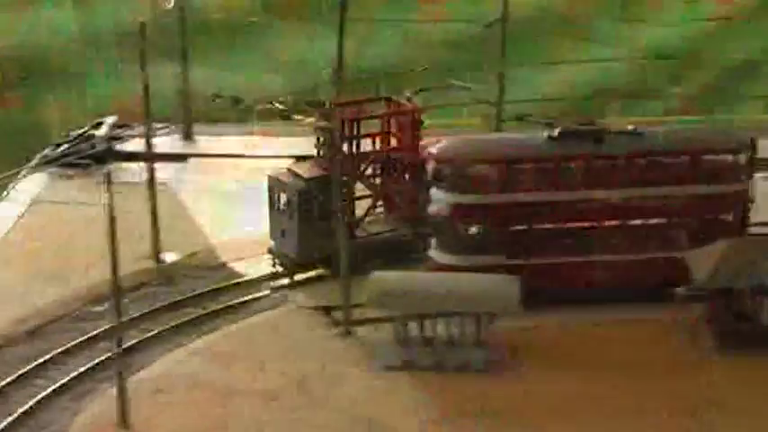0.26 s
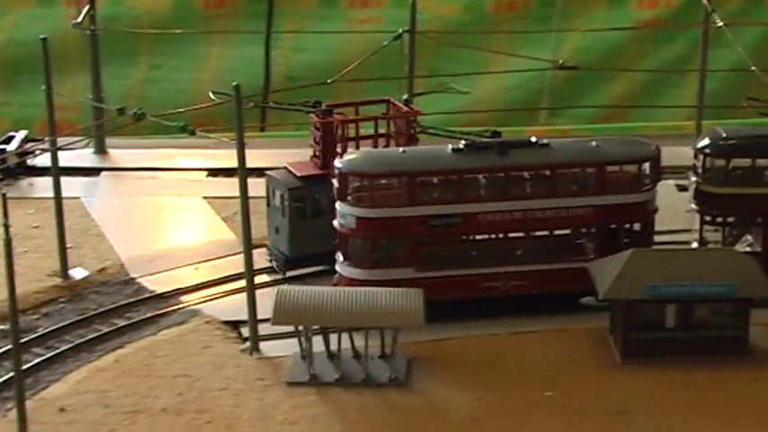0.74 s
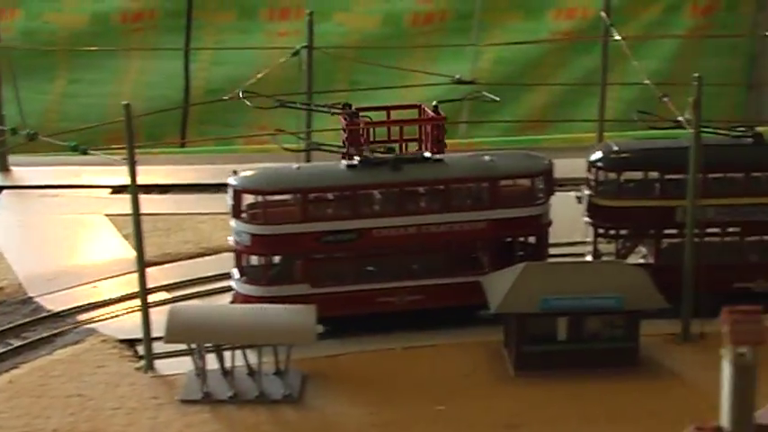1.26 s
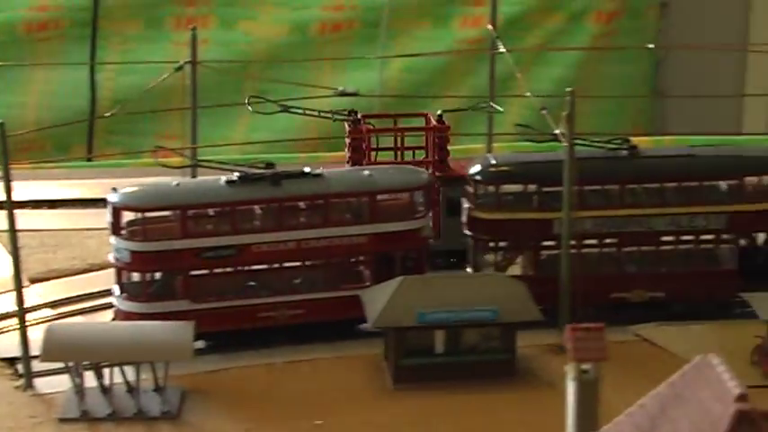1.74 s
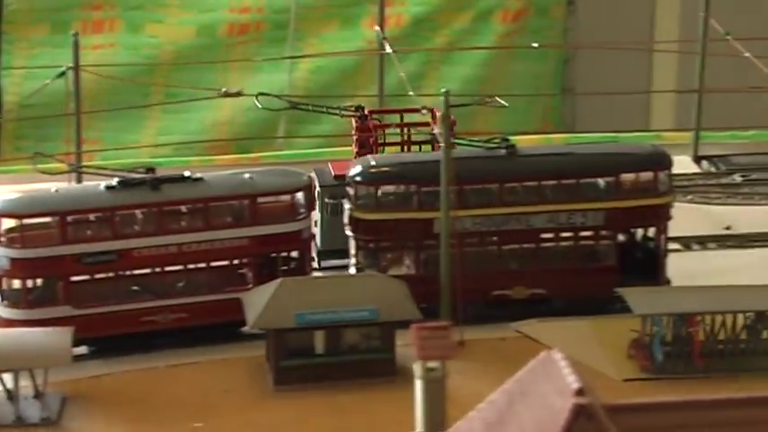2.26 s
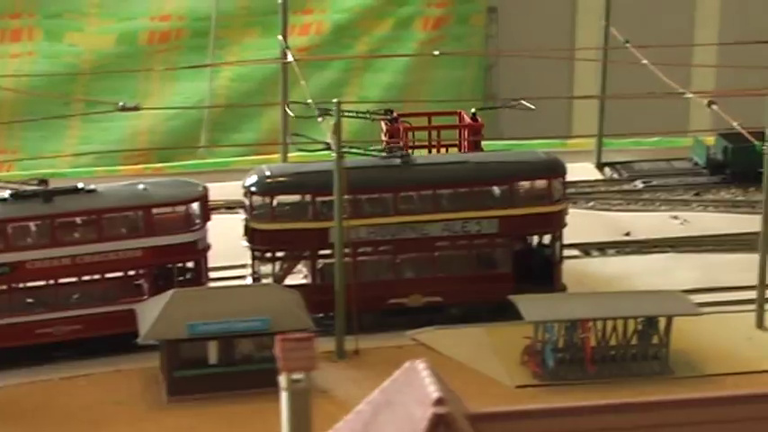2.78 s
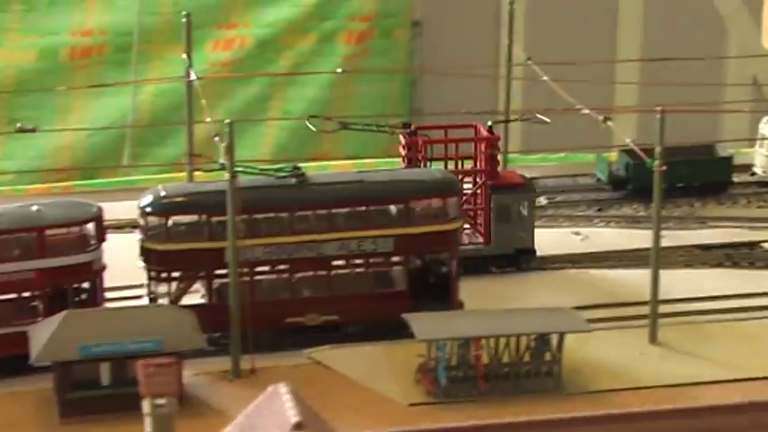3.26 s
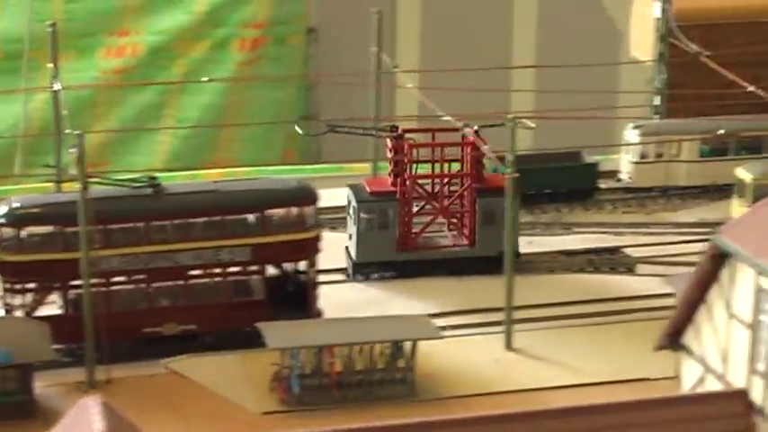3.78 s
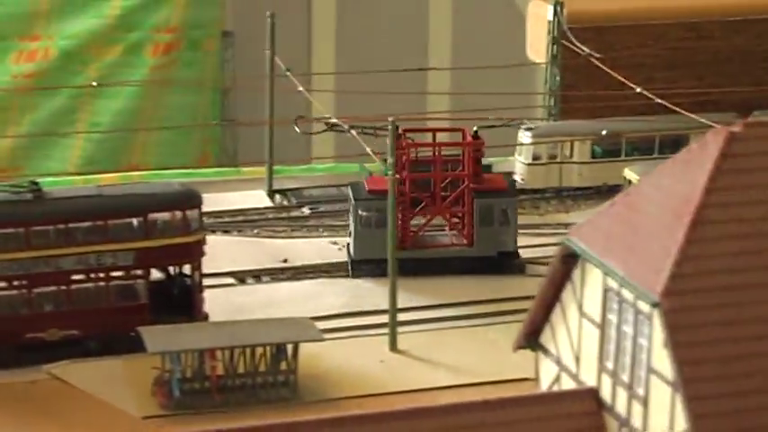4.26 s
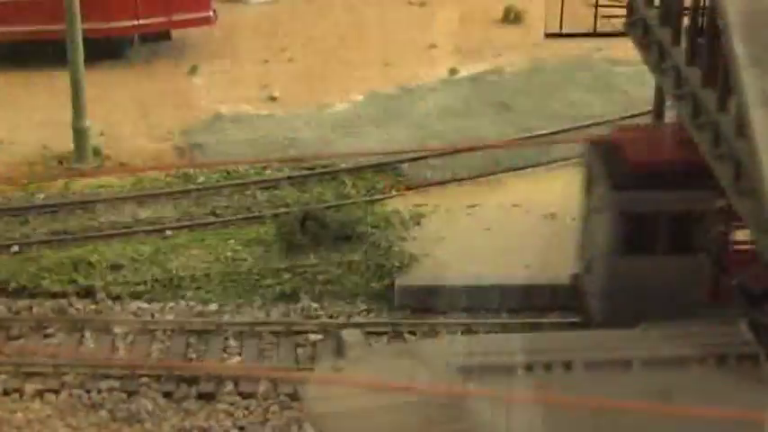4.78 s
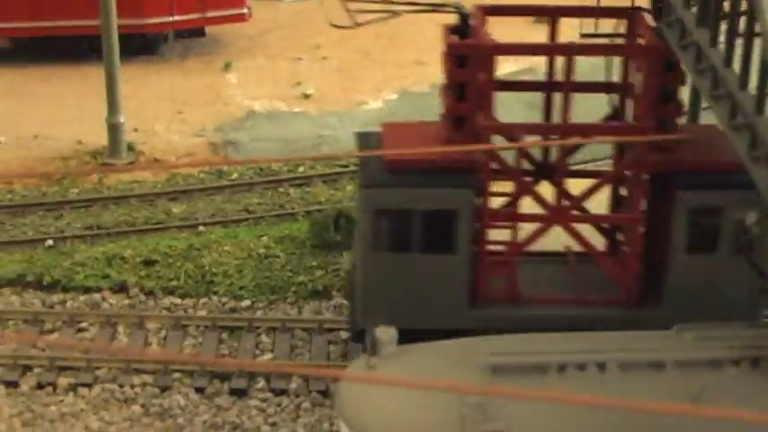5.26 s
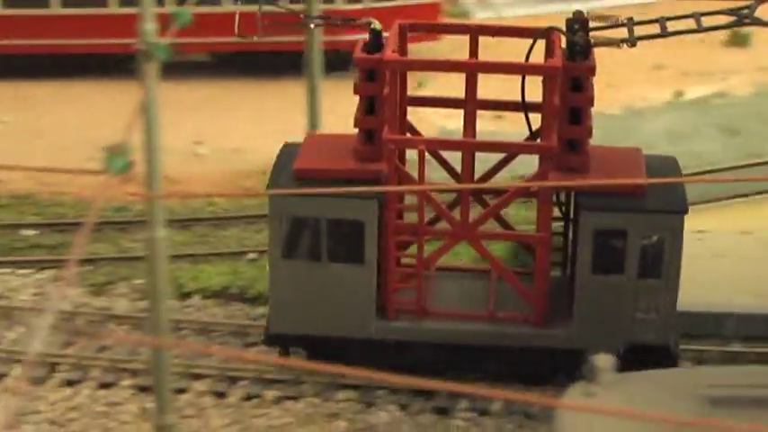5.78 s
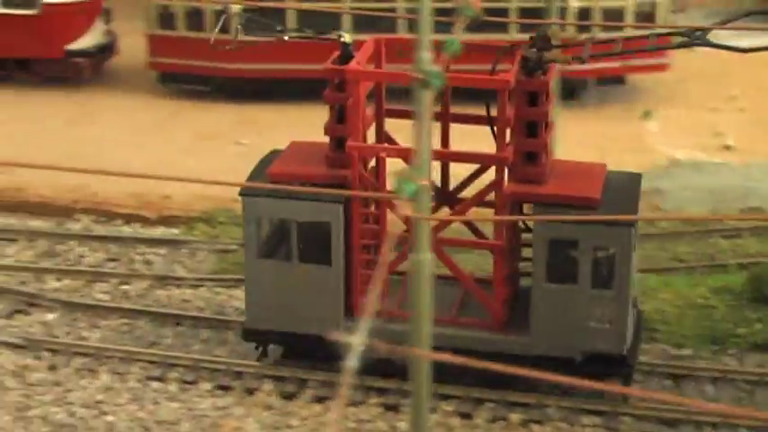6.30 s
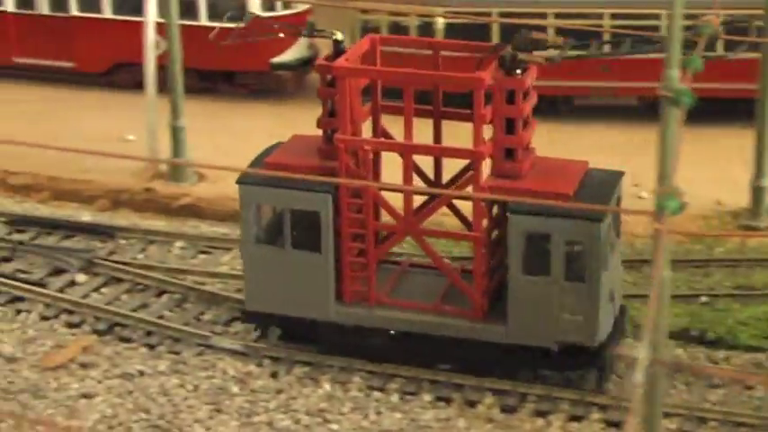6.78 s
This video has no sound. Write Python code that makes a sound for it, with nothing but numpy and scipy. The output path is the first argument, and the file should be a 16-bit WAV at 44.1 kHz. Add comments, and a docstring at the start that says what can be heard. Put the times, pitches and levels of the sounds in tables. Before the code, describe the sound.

A small electric model tram whirs along with a steady hiss and thin high whine, its wheels drumming hollowly and clicking on the track.

```python
"""Model tram on a layout

A model tram is heard fairly close, then farther off, then close again from about 4.8 s; near 0.5 s it dips
briefly. The motor is coloured noise that swings with the rotor, plus noise-fed ringing modes. Wheels drum on
the baseboard as shaped noise, grind as streams of tiny impacts and click over joints as short bursts and rings.
A small room adds a decaying noise tail; a stereo microphone pair hears it all.
"""
import sys
import numpy as np
from scipy import signal
from scipy.fft import rfft, irfft
from scipy.io import wavfile
from scipy.ndimage import uniform_filter1d

SR = 44100
rng = np.random.default_rng(int(sys.argv[2]) if len(sys.argv) > 2 else 0)


def generate_wav(signal):
    """Clip the signal to [-1, 1] and save it as 16-bit WAV at the path in sys.argv[1]."""
    frames = np.transpose(np.atleast_2d(signal))
    scaled = np.clip(frames, -1, 1) * 32767
    pcm = np.round(scaled).astype(np.int16)
    wavfile.write(sys.argv[1], SR, pcm)


N = 310464
TIME, FREQS = np.arange(N) / SR, np.fft.rfftfreq(N, 1 / SR)


def amp(db):
    """Decibels to gain."""
    return 10 ** (np.asarray(db) / 20)


def unit(x):
    """Scales to rms 1."""
    return x / np.sqrt(np.mean(x ** 2) + 1e-20)


def curve(rows, column=1):
    """One column of a table, interpolated over time."""
    table = np.transpose(rows)
    return np.interp(TIME, table[0], table[column])


def read(points, hz):
    """A spectrum table, interpolated on a log-frequency axis."""
    f, value = np.transpose(points)
    return np.interp(np.log(hz + 1), np.log(f + 1), value)


def colour(x, points):
    """Filters by a spectrum table, to rms 1."""
    gain = amp(read(points, FREQS))
    return unit(irfft(rfft(x) * gain, N))


def noise():
    """Two unrelated noises: sound from straight ahead and from the sides."""
    return rng.standard_normal((2, N))


def wander(rate_hz):
    """Slow random signal of rms 1, up to about this rate."""
    lowpass = np.exp(-(FREQS / rate_hz) ** 2)
    return unit(irfft(rfft(rng.standard_normal(N)) * lowpass, N))


def grains(per_s, spread_db, decay_s):
    """Tiny impacts at random times, of uneven size, each a short decaying burst of noise."""
    hits = rng.random(N) < per_s / SR
    sizes = amp(spread_db * np.minimum(rng.exponential(1, N), 4)) * hits
    power = signal.lfilter([1], [1, -np.exp(-2 / (decay_s * SR))], sizes ** 2)
    return unit(np.sqrt(power) * noise())


def resonance(x, hz, width_hz):
    """Rings a double-pole resonance of fixed or moving pitch, to rms 1."""
    turn = np.exp(2j * np.pi * np.cumsum(hz * np.ones(N)) / SR)
    r = np.exp(-np.pi * width_hz / SR)
    # shift the pitch to 0 Hz, low-pass, shift back
    return unit((turn * signal.lfilter([1], np.poly([r, r]), x / turn)).real)


def even(x, steadiness, size):
    """Evens out the strength over a moving window of size samples, to rms 1."""
    power = abs(uniform_filter1d(x[0] ** 2, size=size)) + 1e-9
    return unit(x / power ** steadiness)


def swell(middle_s, length_s):
    """A smooth rise and fall of height 1, down to e^-2 at length_s either side."""
    return np.exp(-2 * ((TIME - middle_s) / length_s) ** 2)


def add(mix, s, sound):
    """Mixes a sound in at a time."""
    part = mix[:, round(s * SR):][:, :sound.shape[-1]]
    part += sound[..., :part.shape[1]]


# how close the tram is heard: t/s, 0 far - 1 close
CLOSENESS = [(0, 0.55), (.4, 0), (4.55, 0.15), (4.95, 0.8), (7.04, 0.61)]


def by_distance(far, close):
    """Mixes the far and close values by how close the tram is heard."""
    closeness = np.clip(curve(CLOSENESS), 0, 1)
    return (1 - closeness) * far + closeness * close


def colour_by_distance(x, far, close):
    """Mixes the far and close colours by how close the tram is heard."""
    return by_distance(colour(x, far), colour(x, close))


FALTER_S, FADE_S, HOLD_S, RECOVER_S = 0.477, 0.029, 0.079, 0.1


def falter():
    """Depth of the brief level dip: 0 running - 1 deepest."""
    corners_s = [-FADE_S, 0, HOLD_S, HOLD_S + RECOVER_S]
    return np.interp(TIME - FALTER_S, corners_s, [0, 1, 1, 0])


# room air spectrum: f/Hz, relative density/dB
AIR_SPECTRUM = [(15, -32), (35, -32), (60, -4.5), (85, -2), (160, -4.5), (300, -6), (450, -9.5), (700, -9),
                (860, 1.5), (1100, -4.5), (1600, -12.5), (6000, -33)]


def room_air(level_db=-62):
    """The air of the room: steady coloured noise."""
    return amp(level_db) * colour(noise(), AIR_SPECTRUM)


# room decay: f/Hz, t60/s
ROOM_T60 = [(250, 0.42), (1000, 0.39), (3000, 0.16), (10000, 0.055)]


def room(x, wet_db=-6.5):
    """A short diffuse tail whose treble dies first."""
    hz, t, z = signal.stft(rng.standard_normal((2, SR // 2)), SR, nperseg=256)
    decay = np.exp(-np.log(1000) * t / read(ROOM_T60, hz)[:, None])
    tail = signal.istft(z * decay, SR, nperseg=256)[1]
    tail[:, :220] = 0  # 5 ms gap before the tail
    tail /= np.linalg.norm(tail[0])
    return x + amp(wet_db) * signal.fftconvolve(x[:1], tail, axes=1)[:, :N]


def reflections(x, strength=0.59, count=14):
    """Short echoes off track and model houses comb the sound, differently at each place on the way."""
    out, t = np.zeros((2, N)), np.arange(1500) / SR
    for place in range(count):
        sparse = rng.standard_normal(len(t)) * (rng.random(len(t)) < .05)
        taps = sparse * np.exp(-t / .018)
        taps *= strength / (np.linalg.norm(taps) + 1e-9)
        taps[0] = 1  # direct sound
        taps /= np.linalg.norm(taps)
        here = np.maximum(1 - abs(TIME / TIME[-1] * (count - 1) - place), 0)
        out += here * signal.oaconvolve(x, taps[None], axes=1)[:, :N]
    return out


# narrow board modes, far and close: f/Hz, width/Hz, boost/dB
MODES_FAR = [(244, 9.7, 9.5), (311, 110, 9), (317, 13, 5.5), (435.3, 14, 10.5), (531, 23, 18.5),
             (624, 4.2, 23.5), (680, 14, 13.5), (745, 8.9, 18.5), (980, 23, 25)]
MODES_CLOSE = [(216, 16, 6.5), (256, 9, 5.3), (291, 62, 7), (431, 12, 4.4), (480, 15, 13), (508, 5.8, 2.7),
               (571.5, 13, 16.6), (651, 2.6, 17.4), (716, 10, 5), (943, 21, 11)]


def board(x, modes, response):
    """The board's sound: a broad response with narrow modes standing out of it."""
    modes_db = sum(db / (1 + (2 * (FREQS - hz) / width) ** 2) for hz, width, db in modes)
    return colour(irfft(rfft(x) * amp(modes_db), N), response)


def second_mode(far_hz=612, close_hz=500, far_db=-21, close_db=-13,
                hollow_db=10, hollow_s=2.61, hollow_length_s=0.97):
    """The board's second mode, noise-fed, boosted on the hollow middle stretch."""
    ring = resonance(noise(), by_distance(far_hz, close_hz), width_hz=143)
    level_db = by_distance(far_db, close_db) + hollow_db * swell(hollow_s, hollow_length_s)
    return ring * amp(level_db)


# table boom: t/s, level/dB before boom_db
BOOM = [(.1, -52.5), (.35, -62.5), (2.3, -62.5), (2.95, -77), (3.4, -58), (5.0, -54.5), (7.04, -62)]
# table boom spectrum: f/Hz, relative density/dB
TABLE_SPECTRUM = [(30, -47), (80, -16.5), (120, -8.5), (155, -2), (205, -3), (260, -5), (500, -21)]


def table_boom(boom_db=-2):
    """The table booms: low coloured noise of changing level."""
    return colour(noise(), TABLE_SPECTRUM) * amp(curve(BOOM) + boom_db)


# rolling force on the board, greatest on the hollow middle stretch: t/s, relative level/dB
ROLLING = [(0, -54.5), (.55, -53.5), (.72, -52.5), (1.3, -58), (1.8, -48), (2.2, -45.5), (3.5, -48.5),
           (4.05, -54.5), (4.45, -51.5), (4.8, -52), (5.1, -50.5), (5.95, -52.5), (6.4, -49), (7.04, -48.5)]
# main board mode, shifting with the tram's place: t/s, f/Hz, level/dB before evening and rolling force
HUM = [(0, 293, -4.5), (1.7, 300, -11.5), (2.25, 317.6, -0.5), (2.6, 315, 1.5), (3.3, 331.6, -6),
       (4.05, 327.6, -1.5), (4.2, 327, 2), (4.45, 340, 1), (4.6, 344, 2), (4.8, 300, -7.5),
       (7.04, 311, -5.5)]
# broad board response, far and close: f/Hz, relative density/dB
BOARD_FAR = [(20, -75), (100, -44), (160, -29), (215, -11), (260, -1.5), (320, -4), (375, -10), (425, -7),
             (480, -54), (540, -16), (720, -16), (900, -39), (1400, -54), (3000, -73)]
BOARD_CLOSE = [(20, -60), (60, -26), (145, -16), (190, -3.5), (240, -5.5), (295, -6), (365, -4.5),
               (450, -1.5), (560, -12.5), (800, -4.5), (1200, -18.5), (1800, -10), (3500, -31)]


def baseboard(level_db=-2, lumps_db=1.0, steadiness=0.27, falter_db=-5):
    """Rough wheels drum on the hollow board under the track: noise through its modes."""
    wheels = noise()
    far, close = board(wheels, MODES_FAR, BOARD_FAR), board(wheels, MODES_CLOSE, BOARD_CLOSE)
    hum_hz = curve(HUM) + 3 * wander(12)
    hum = even(resonance(noise(), hum_hz, width_hz=31), .2, size=4000)
    drum = amp(level_db) * by_distance(far, close) + hum * amp(curve(HUM, column=2)) + second_mode()
    # partly evens out the drumming
    power = uniform_filter1d(drum[0] ** 2, size=4000) + 1e-9
    force_db = curve(ROLLING) + lumps_db * wander(39) + falter_db * falter()
    return drum / power ** steadiness * amp(force_db)


# bumps: t/s, level/dB before the envelope, f/Hz
THUMPS = [(0.063, -37.5, 263), (0.074, -44, 160), (0.321, -36.5, 297), (0.4966, -35.5, 305),
          (0.688, -34.5, 297), (0.781, -39, 294), (1.769, -31.5, 291), (2.127, -32, 290),
          (2.1736, -30, 317), (2.281, -31, 298), (2.409, -32.5, 253), (2.463, -30, 301), (3.3233, -36, 303),
          (3.524, -28.5, 268), (4.3058, -36, 314), (4.404, -36, 327), (4.542, -40, 330), (4.577, -34, 333),
          (5.826, -42, 180), (6.683, -35, 307), (6.714, -45, 299)]


def bumps(decay_s=0.011, rise_s=0.0049):
    """A bump sets the board swinging for a few cycles, at a pitch that depends on the place."""
    out, t = np.zeros((2, N)), np.arange(SR // 8) / SR
    envelope = np.exp(-t / decay_s) * (1 - np.exp(-t / rise_s))
    for s, db, pitch in THUMPS:
        add(out[:1], s, amp(db) * np.sin(2 * np.pi * pitch * t) * envelope)
    return out


# rail joint knocks: t/s, level/dB before click_db and envelope, centre f/Hz, spread/octaves, decay/s
CLICKS = [(0.321, -46, 2800, 1.5, 0.005), (0.503, -49, 1800, 1, 0.0069), (0.508, -55, 8000, 0.34, 0.0098),
          (0.5452, -40.5, 5200, 1.9, 0.0017), (0.5447, -43, 2300, 0.62, .002),
          (0.554, -41, 8000, 0.37, .002), (.578, -42, 5000, 1.5, .002), (.596, -46, 3300, 0.68, .002),
          (.6018, -37.5, 3880, 1.6, 0.0035), (.6105, -43, 6000, 1.2, 0.005),
          (1.5532, -43.5, 4470, 0.79, 0.0037), (1.668, -44, 3480, 0.86, 0.0079),
          (2.029, -38.5, 8000, 0.53, 0.0026), (2.0375, -39, 7500, .6, .003),
          (2.6827, -40.5, 5000, 0.66, 0.003), (2.895, -41.5, 4300, 0.91, 0.011),
          (3.3205, -46, 6470, 0.6, 0.0071), (3.5235, -49.5, 7800, .4, .009),
          (3.5302, -41, 3400, .35, 0.0039), (3.538, -48, 3100, 0.24, 0.013),
          (3.5676, -39, 7200, 0.31, 0.0017), (3.931, -45, 5000, 1.3, 0.0047),
          (4.229, -32, 6400, 0.84, 0.0034), (4.2344, -38, 3400, 2.1, 0.012),
          (4.4036, -47.5, 5500, 2.3, 0.024), (4.461, -43.5, 4500, 2.3, .01),
          (4.472, -50, 650, 0.65, 0.0087), (4.683, -56, 3000, 2.6, 0.012), (4.707, -45, 7000, 0.37, 0.011),
          (5.6187, -37.5, 7500, 0.88, 0.015), (5.621, -36.5, 3500, 1.3, 0.012),
          (5.772, -49, 3300, .25, .014), (5.784, -46.5, 1100, 1.2, 0.014), (5.788, -46.5, 620, 0.35, 0.015),
          (5.786, -48, 9500, .3, .012), (5.788, -46, 2900, 0.57, 0.0054), (5.809, -51, 3300, .4, .003),
          (5.811, -59, 1100, .8, .01), (6.463, -42, 4200, 0.74, .004), (6.529, -45, 2900, 1, .004),
          (6.669, -47, 4000, 0.74, 0.0045), (6.684, -42, 3400, 1.0, .004), (6.715, -46.5, 2000, .4, 0.004),
          (6.903, -42, 4900, 1, 0.0057)]
# soft-edged contact of small wheels: f/Hz, gain/dB
CONTACT = [(200, -11), (800, 4.5), (9000, 6.5), (10800, 1.5), (14000, -1)]
# parts ringing as a wheel drops into a rail gap: t/s, f/Hz, level/dB before the envelope, decay/s
RINGS = [(0.545, 8500, -37, 0.0023), (3.524, 3000, -31, 0.0023), (3.5674, 6520, -23.5, 0.0012),
         (3.567, 8800, -33.5, 0.0013), (5.6196, 1740, -38.5, 0.0065), (5.785, 1200, -42, 0.0078)]


def joints(click_db=1, rise_s=0.0003):
    """Each knock is a brief noise clatter of small parts; decaying sines are parts left ringing."""
    out, t = np.zeros((2, N)), np.arange(8192) / SR
    hz = np.fft.rfftfreq(len(t), 1 / SR)
    onset = 1 - np.exp(-t / rise_s)
    for s, db, centre, spread, decay in CLICKS:
        octaves = np.log2((hz + 1) / centre)
        bell = np.exp(-(octaves / spread) ** 2 / 2) * amp(read(CONTACT, hz))
        clatter = unit(irfft(rfft(rng.standard_normal((2, len(t)))) * bell))
        add(out, s, amp(db + click_db) * clatter * np.exp(-t / decay) * onset)
    for s, pitch, db, decay in RINGS:
        ring = np.sin(2 * np.pi * pitch * t) * np.exp(-t / decay) * onset
        add(out[:1], s, amp(db) * ring)
    return out


# rims singing on the curves: middle t/s, length/s, f/Hz, level/dB
SINGS = [(2.07, .16, 5600, -62), (4.1, .3, 3560, -62), (4.15, .14, 5620, -62), (4.3, .38, 3910, -58.5),
         (5.0, .4, 4830, -63), (5.25, .45, 3660, -62)]


def rims(width_hz=140):
    """A rubbed wheel rim sings thinly for a moment: noise through a narrow resonance."""
    rubbing = noise()
    return sum(resonance(rubbing, hz, width_hz) * amp(db) * swell(s, length)
               for s, length, hz, db in SINGS)


SHELL_HZ, SHELL_SAG_HZ = 1895, 150
# loose shell ticking on the chassis: t/s, level/dB before room, f/Hz
TICKS = [(0.323, -39, 1800), (.337, -44, 1900), (.381, -49, 1850), (.351, -42, 1900), (.363, -43, 1890),
         (.603, -43, 1840), (.619, -46, 1800), (1.929, -50, 1900), (4.134, -42, 1940),
         (5.0506, -34.5, 1760), (5.078, -37.5, 1800), (5.105, -38, 1800), (5.119, -34, 1840),
         (5.668, -36, 1750), (6.4422, -36, 2000), (6.456, -37, 2010), (6.5183, -36, 1910),
         (6.522, -39, 1950), (6.531, -37, 1640), (6.544, -38, 1960), (6.557, -36, 1950), (6.639, -41, 1500),
         (6.673, -42, 2000), (6.685, -39, 1950), (6.714, -40, 2050), (6.72, -43, 2160), (6.986, -36, 1830)]


def shell(turns, spread_db=2.5, buzz_db=-61, buzz_s=5.3, buzz_length_s=0.82, tick_decay_s=0.0011, wet_db=-13):
    """The loose body shell taps once per motor turn around buzz_s, and ticks at jolts."""
    out, t = np.zeros((2, N)), np.arange(SR // 20) / SR
    sizes = amp(spread_db * np.clip(rng.standard_normal(N), -2, 2))
    taps = np.diff(np.floor(turns), prepend=0) * sizes
    buzz = resonance(taps, SHELL_HZ - SHELL_SAG_HZ, width_hz=340)
    out[0] = buzz * amp(buzz_db) * swell(buzz_s, buzz_length_s)
    for s, db, pitch in TICKS:
        tick = np.sin(2 * np.pi * pitch * t) * np.exp(-t / tick_decay_s)
        add(out[:1], s, amp(db) * tick)
    return room(out, wet_db)


# towards the points the running gear works ever harder
POINTS_FROM_S, SCRAPE_DB_PER_S, CHATTER_DB_PER_S = 5.6, 4, 2
# binding flanges, also played by flanges():
# middle t/s, length/s, scrape level/dB and chatter level/dB (each before bind_db)
BINDS = [(0.343, 0.072, -60, -54.5), (0.628, 0.032, -51, -54), (0.86, 0.041, -51.5, -63),
         (1.314, 0.1, -51, -66), (1.678, .08, -62, -66), (1.917, 0.081, -52, -54.5),
         (2.106, 0.12, -50, -71), (2.436, .07, -59, -62), (2.71, 0.049, -56, -59), (2.916, .06, -55, -69),
         (4.04, 0.52, -54, -62), (4.24, 0.054, -54, -57), (4.54, 0.15, -50, -72), (4.712, 0.048, -51, -54),
         (5.67, 0.058, -54, -54), (6.535, 0.037, -64, -62), (6.7, 0.049, -64, -55)]
# gear chatter spectrum: f/Hz, relative density/dB
GEAR_SPECTRUM = [(600, -36), (1200, -11.5), (1750, -1.5), (2100, -12), (2700, -1.5), (5000, -23),
                 (10000, -18)]


def gears(far_db=-66, close_db=-60.5, bind_db=-5, uneven_db=2, shell_db=-3):
    """Loose gears chatter as sparse impacts, harder when wheels bind, and then set the shell buzzing."""
    steady_db = by_distance(far_db, close_db) + CHATTER_DB_PER_S * np.maximum(TIME - POINTS_FROM_S, 0)
    binding = sum(amp(db + bind_db) * swell(s, length) for s, length, _, db in BINDS)
    level = np.hypot(amp(steady_db + uneven_db * wander(5.4)), binding)
    chatter = colour(grains(per_s=180, spread_db=5.0, decay_s=0.0029), GEAR_SPECTRUM)
    shell_hz = SHELL_HZ - by_distance(0, SHELL_SAG_HZ)
    buzz = resonance(grains(per_s=510, spread_db=1.5, decay_s=0.0011), shell_hz, width_hz=520)
    return chatter * level + buzz * amp(shell_db) * binding


# rail scrape spectrum: f/Hz, relative density/dB
GRIT = [(600, -29), (1500, -3.5), (2800, -5.5), (5000, 1), (6500, -0.5), (7600, 0.5), (9200, -0.5),
        (11000, -5), (13500, -11.5)]


def flanges(far_db=-59.5, close_db=-55, bind_db=1, uneven_db=1, falter_db=-6):
    """Wheel flanges grind along the rails as dense tiny impacts, louder wherever they bind."""
    steady_db = by_distance(far_db, close_db) + SCRAPE_DB_PER_S * np.maximum(TIME - POINTS_FROM_S, 0)
    binding = sum(amp(db + bind_db) * swell(s, length) for s, length, db, _ in BINDS)
    level = np.hypot(amp(steady_db + uneven_db * wander(8.3) + falter_db * falter()), binding)
    return colour(grains(per_s=1000, spread_db=2.0, decay_s=0.0011), GRIT) * level


# flange catching a rail end: t/s, level/dB before the envelope, decay/s
SCRAPES = [(2.109, -45, .04), (2.133, -52, .025), (2.176, -57, 0.027), (3.32, -39.5, 0.017)]
# caught flange spectrum: f/Hz, relative density/dB
FLANGE_SPECTRUM = [(900, -31), (1900, -7), (2800, 3.5), (4400, -4), (6500, -7), (12000, -16)]


def scrapes(rise_s=0.002):
    """A flange catches the rail and grinds free in a dying run of tiny slips."""
    level = 0
    for s, db, decay in SCRAPES:
        age = np.maximum(TIME - s, 0)
        level = level + amp(db) * np.exp(-age / decay) * (1 - np.exp(-age / rise_s))
    return colour(grains(per_s=900, spread_db=1.0, decay_s=0.00088), FLANGE_SPECTRUM) * level


def rotor(mean_hz=73.5, drift=0.011):
    """Turns of the motor so far, at a slightly drifting speed."""
    return np.cumsum(mean_hz * (1 + drift * wander(3.7))) / SR


def commutation(turns, poles=0.15):
    """Brush pressure swings once a turn and at each of the three poles."""
    angle = 2 * np.pi * turns
    once = .09 * (np.cos(angle) + np.cos(2 * angle) / 2)
    return unit(1 + once + poles * np.cos(3 * angle))


# brush hiss: t/s, level/dB before hiss_db
BRUSHES = [(0, -56.5), (.11, -56.5), (.18, -56.5), (.33, -55), (1.9, -53.5), (3.4, -54), (4.7, -55.5),
           (5.3, -53), (5.8, -51), (7.04, -51)]
# brush hiss spectrum, far and close: f/Hz, relative density/dB
HISS_FAR = [(300, -27), (600, -1.5), (1200, -11), (2300, -5), (3000, -5), (3900, -0.5), (4600, 1),
            (5700, -4.5), (7000, -7.5), (10000, -11.5), (13500, -12.5)]
HISS_CLOSE = [(500, -22), (1200, -12.5), (2400, -13.5), (3300, -7.5), (4200, -4), (4750, -5), (5300, -0.5),
              (5800, -10), (7000, -10.5), (10000, -16.5), (13500, -17)]
# upper motor mode pitch: t/s, f/Hz
WHINE_HZ = [(0, 5220), (1.0, 5220), (1.75, 5190), (2.5, 5250), (3.3, 5170), (4.15, 5210), (4.9, 5272),
            (5.5, 5295), (6.1, 5235), (7.04, 5215)]
# motor ringing: t/s, upper mode level/dB, lower mode level/dB (both before whine_db)
WHINE = [(0, -52.5, -63), (.19, -62, -68), (.35, -55, -66), (.65, -61, -59), (.93, -50, -58.5),
         (1.12, -55.5, -56), (1.6, -58, -53.5), (2.2, -63, -65), (2.5, -56, -61), (3.0, -57, -65),
         (3.27, -55, -57), (3.5, -59, -58), (3.9, -62, -66), (4.15, -56, -58), (4.65, -64, -70),
         (4.94, -50.5, -56), (5.2, -57, -55), (5.65, -57, -62), (5.95, -56, -53), (6.15, -64, -53),
         (6.35, -58, -62), (6.65, -59, -63), (6.87, -52, -51), (7.04, -52, -54)]
# worm drive whirr: t/s, f/Hz, level/dB
WHIRR = [(0, 3750, -54), (.4, 3600, -75), (3.3, 3530, -63), (4.4, 3930, -76), (4.9, 4030, -70),
         (5.7, 3920, -68), (6.3, 4100, -53.5), (7.04, 4230, -59.5)]


def motor(turns, hiss_db=3, whine_db=-2.5, lower_hz=5095, flutter_db=0.57, falter_db=-7):
    """Brushes hiss on the commutator; the motor rings with it in two close modes, the drive in one."""
    pressure = commutation(turns) * amp(flutter_db * wander(22))
    hiss = colour_by_distance(noise() * pressure, HISS_FAR, HISS_CLOSE) * amp(curve(BRUSHES) + hiss_db)
    upper = even(resonance(noise() * pressure, curve(WHINE_HZ), width_hz=160), .3, size=2000)
    lower = even(resonance(noise() * pressure, lower_hz, width_hz=80), .35, size=2000)
    whine = upper * amp(curve(WHINE)) + lower * amp(curve(WHINE, column=2))
    whirr = resonance(noise() * pressure, curve(WHIRR), width_hz=600) * amp(curve(WHIRR, column=2))
    return amp(falter_db * falter()) * (reflections(hiss) + amp(whine_db) * whine + whirr)


# microphone level difference: f/Hz, left minus right/dB
BALANCE = [(30, -4), (130, 1.5), (300, 1.5), (550, 2), (1000, 0.2), (2000, 0.3), (4500, 1.2), (12000, -1.2)]
# side gain, far and close: f/Hz, side minus front/dB
SIDE_FAR = [(30, -6), (70, -7), (130, -9), (280, -21), (550, -12.5), (1100, -5.5), (2200, -6),
            (4500, -12.5), (8000, -10.5), (12000, -6)]
SIDE_CLOSE = [(30, -6), (70, -12), (130, -17), (280, -28), (550, -21), (1100, -17), (2200, -16),
              (4500, -14.5), (8000, -11), (12000, -4)]


def microphones(x):
    """Front and side sound reach the left and right capsules; a close tram sounds narrower."""
    lean = amp(read(BALANCE, FREQS) / 2)
    front, side = rfft(x)
    far, close = (irfft(side * amp(read(width, FREQS)), N) for width in (SIDE_FAR, SIDE_CLOSE))
    side = rfft(by_distance(far, close))
    return irfft(np.array([(front + side) * lean, (front - side) / lean]), N)


def scene():
    """The tram on its board, in the room."""
    turns = rotor()
    under = baseboard() + table_boom() + bumps()
    running_gear = reflections(flanges() + gears()) + scrapes() + rims()
    tram = motor(turns) + shell(turns) + running_gear
    return microphones(room_air() + under + room(joints()) + tram)


def record(dry, notch_hz=990, notch_width_hz=55, notch_db=-13, edge_hz=13700):
    """The recorder has a narrow notch near 1 kHz and a steep upper band limit."""
    notch = amp(notch_db / (1 + ((FREQS - notch_hz) / notch_width_hz) ** 2))
    edge = (1 - np.tanh((FREQS - edge_hz) / 90)) / 2
    return irfft(rfft(dry) * notch * edge, N)


dry = scene()
out = record(dry)
generate_wav(out)
```